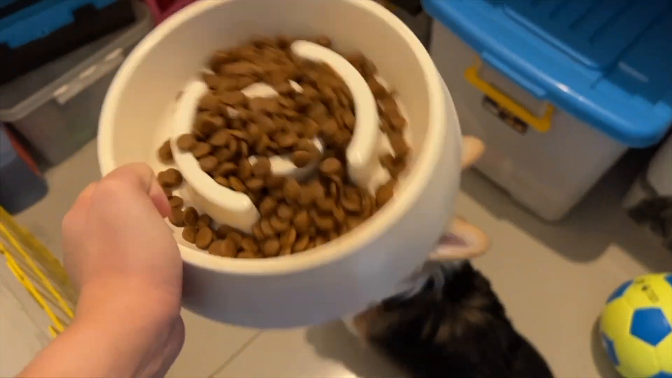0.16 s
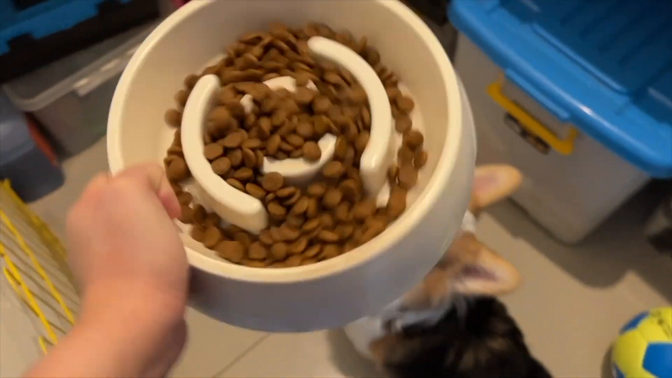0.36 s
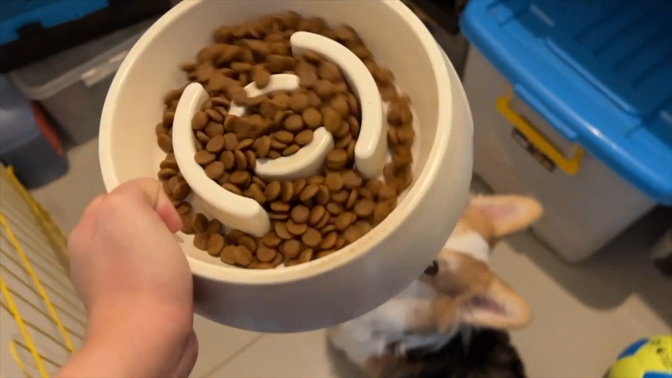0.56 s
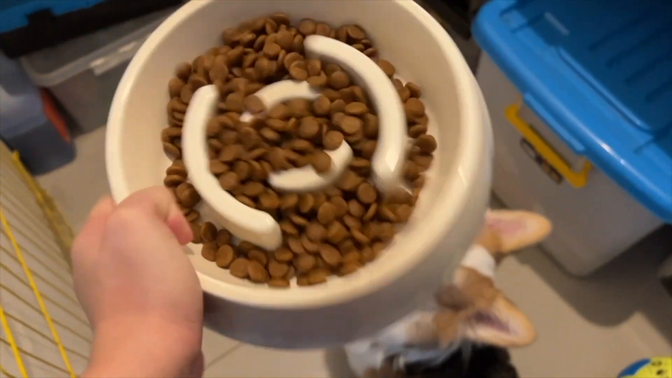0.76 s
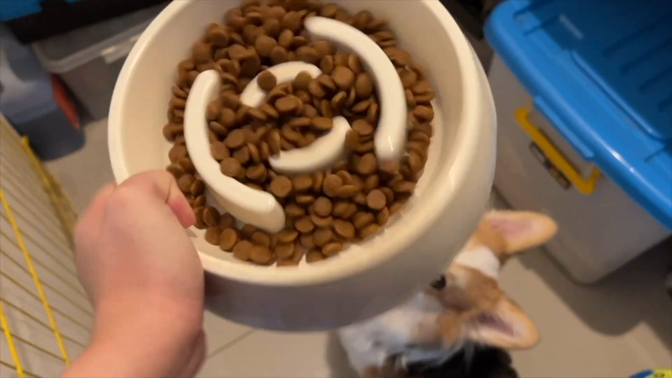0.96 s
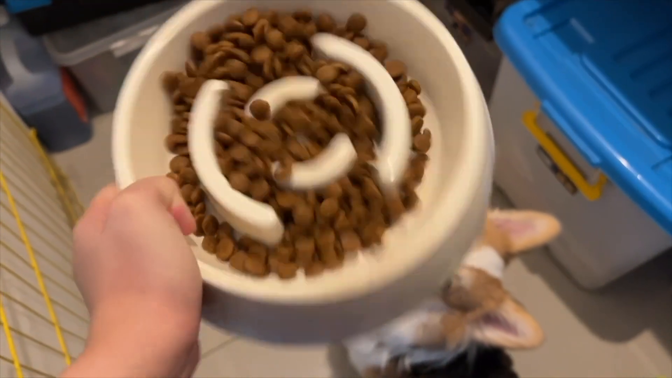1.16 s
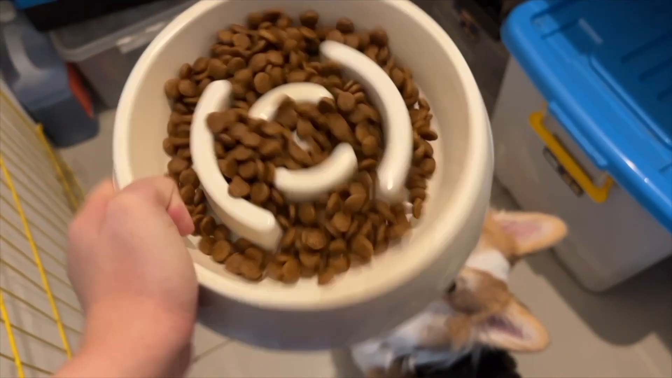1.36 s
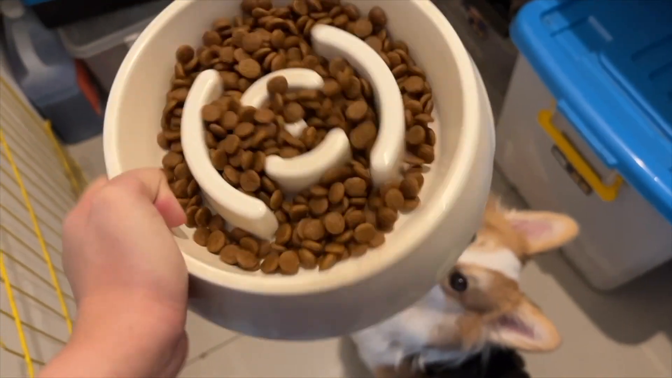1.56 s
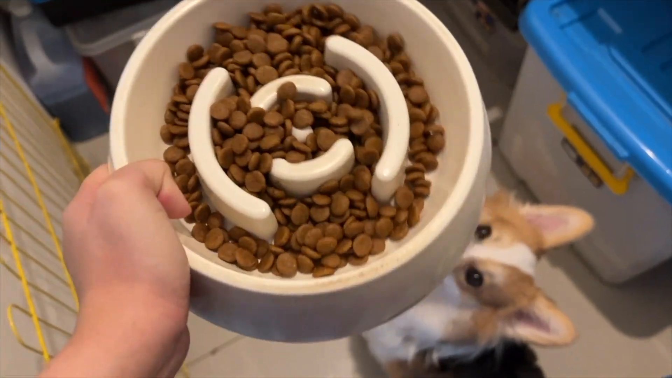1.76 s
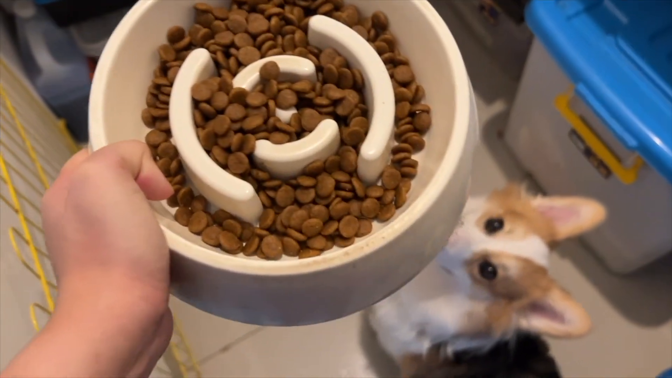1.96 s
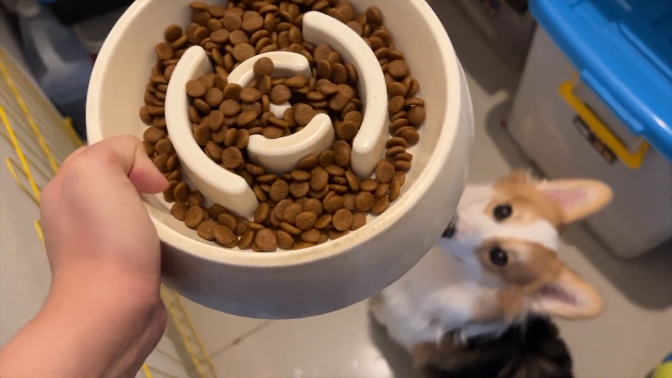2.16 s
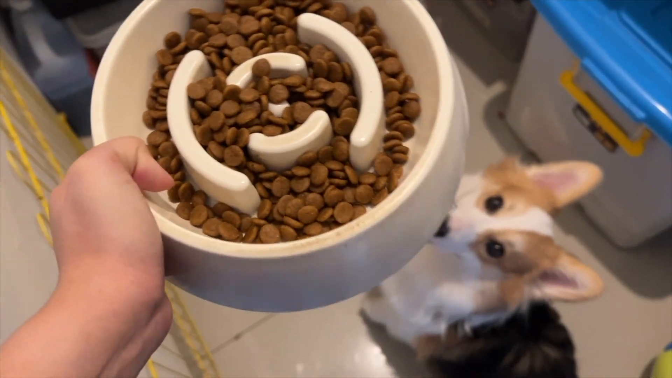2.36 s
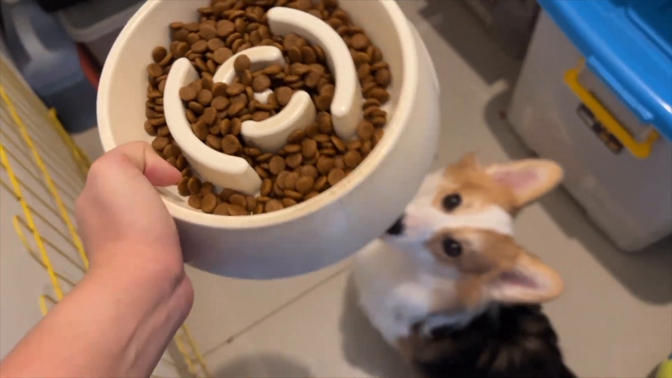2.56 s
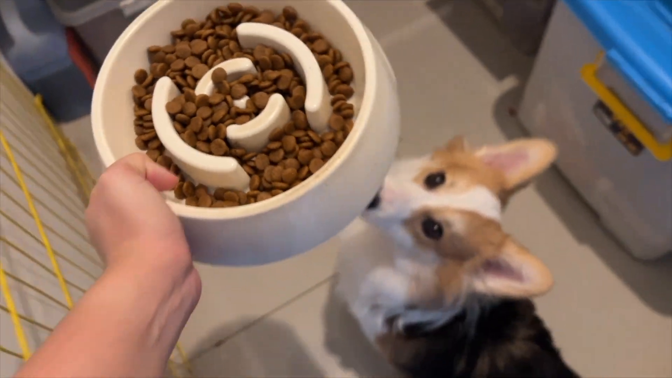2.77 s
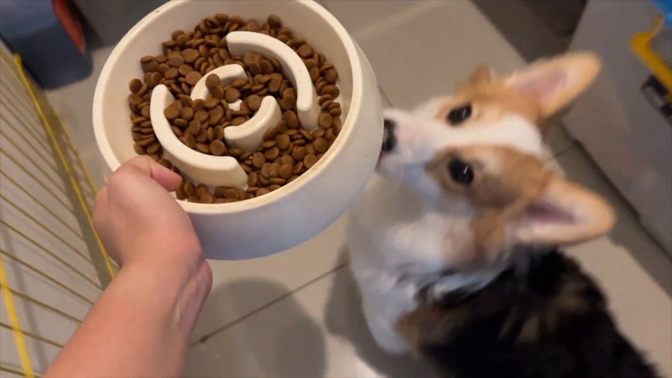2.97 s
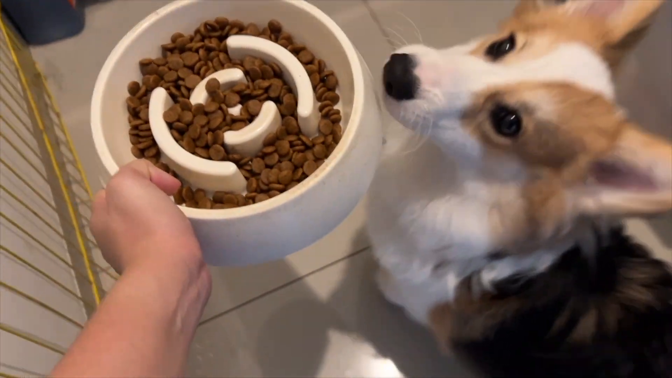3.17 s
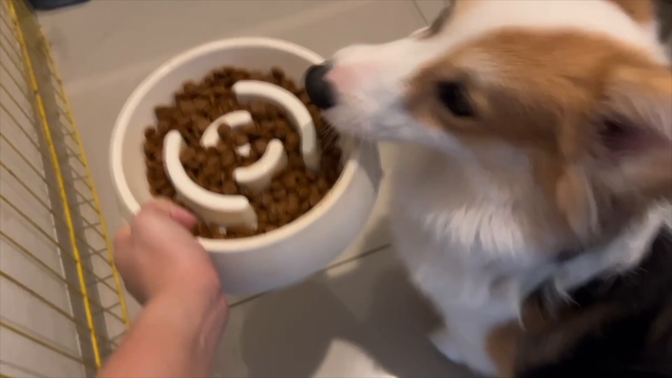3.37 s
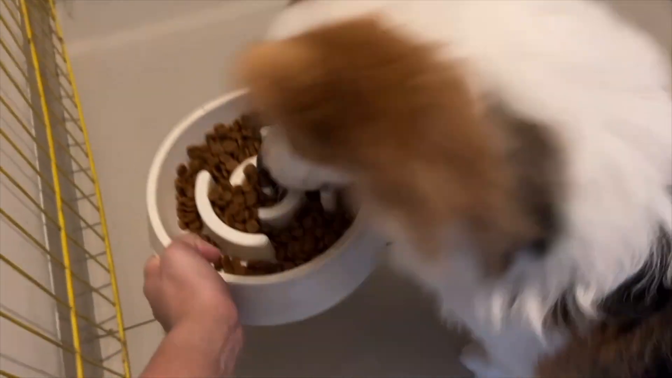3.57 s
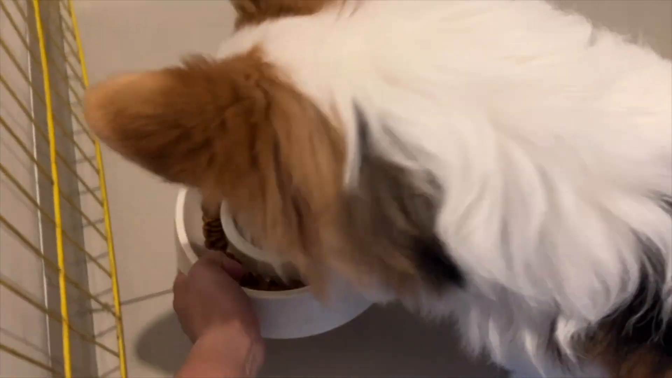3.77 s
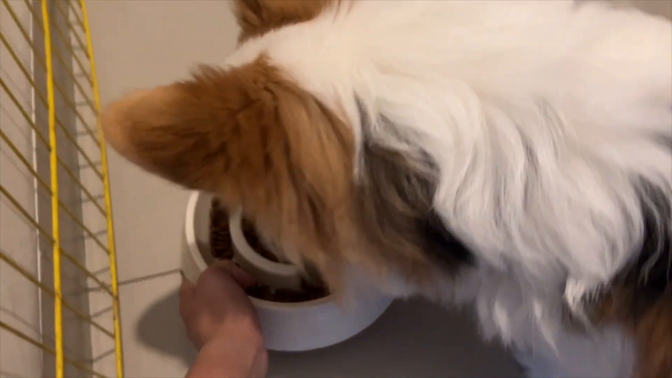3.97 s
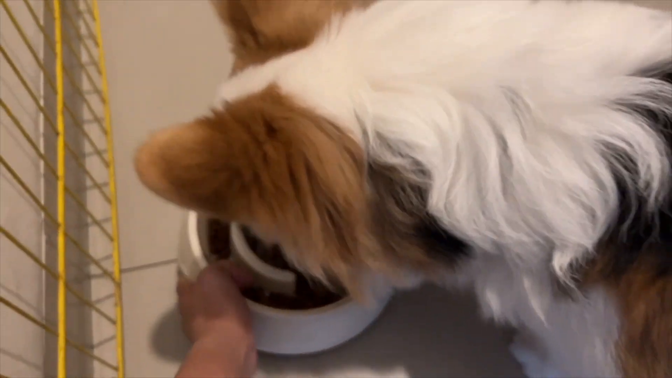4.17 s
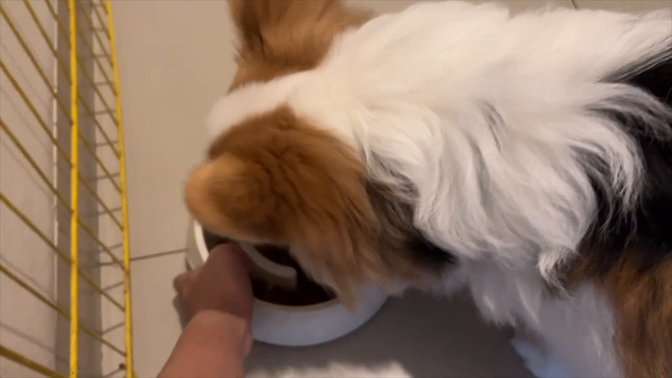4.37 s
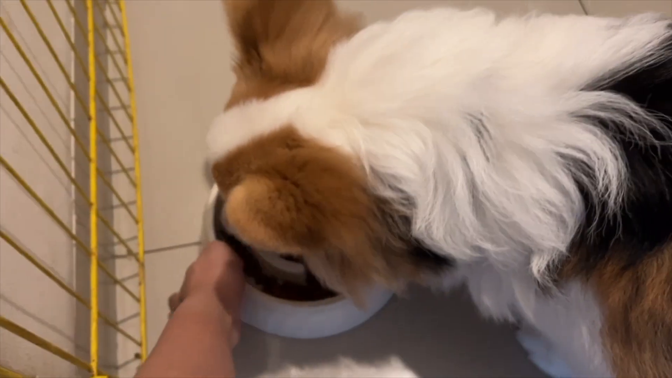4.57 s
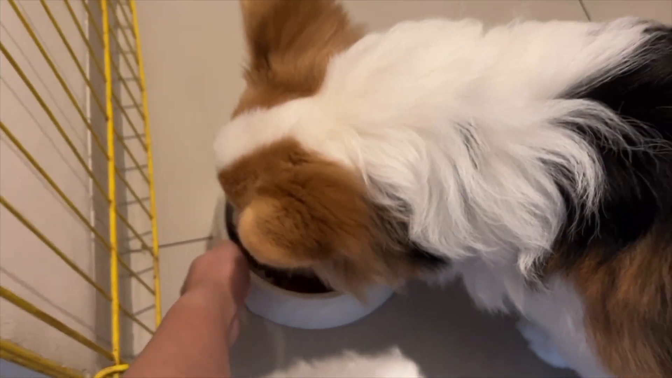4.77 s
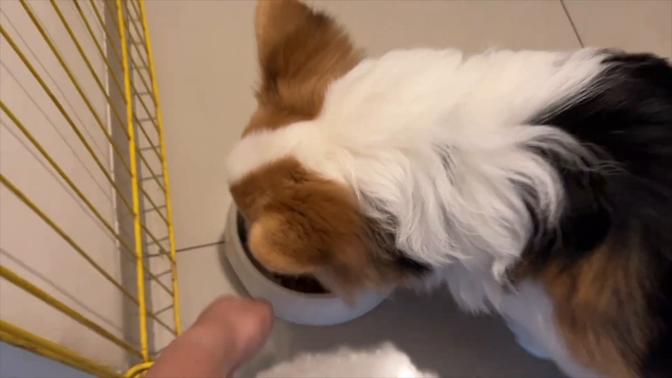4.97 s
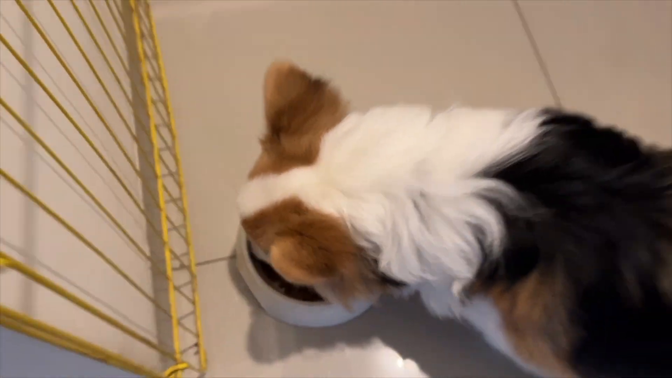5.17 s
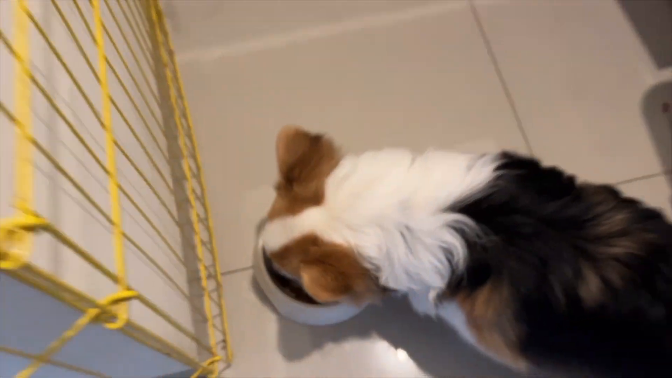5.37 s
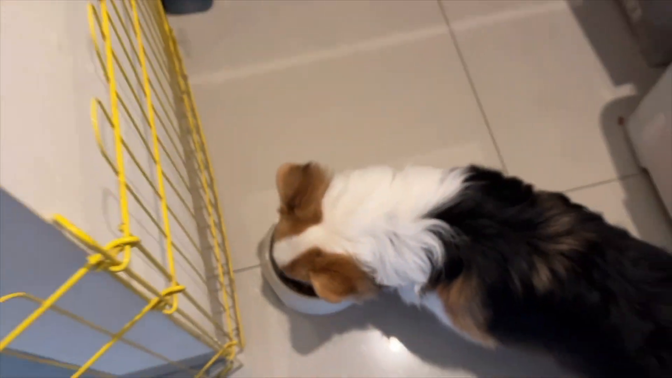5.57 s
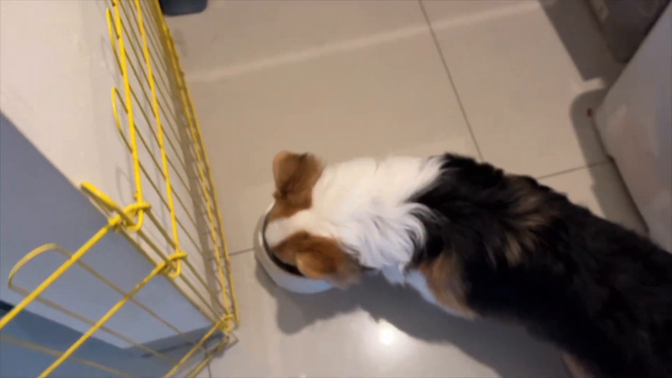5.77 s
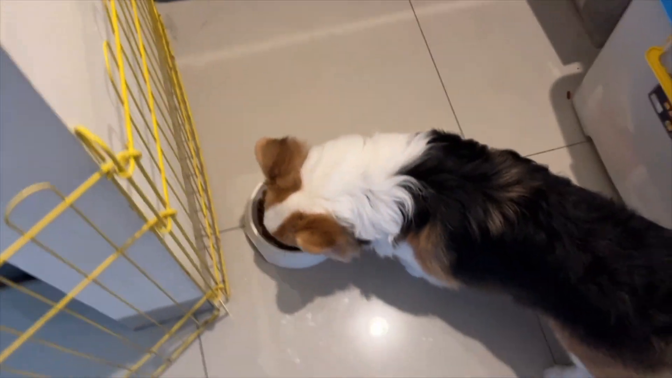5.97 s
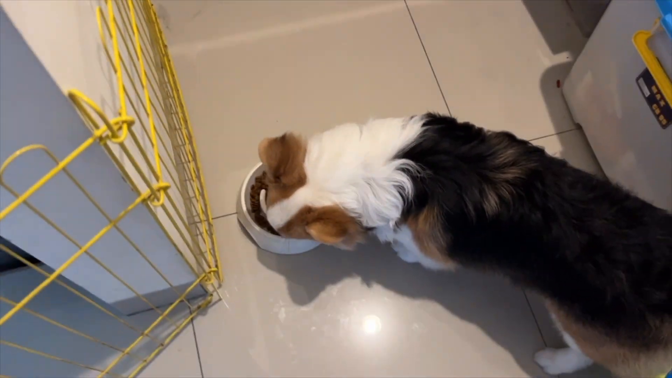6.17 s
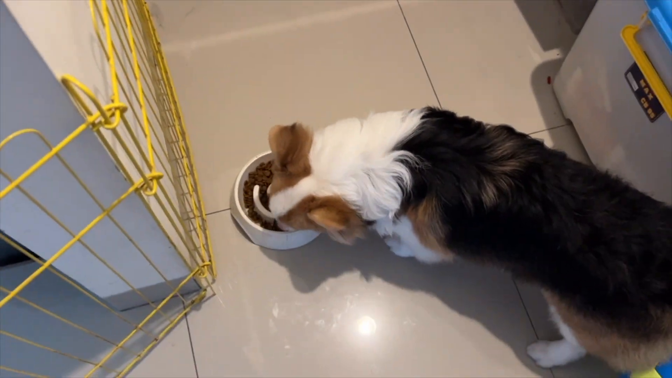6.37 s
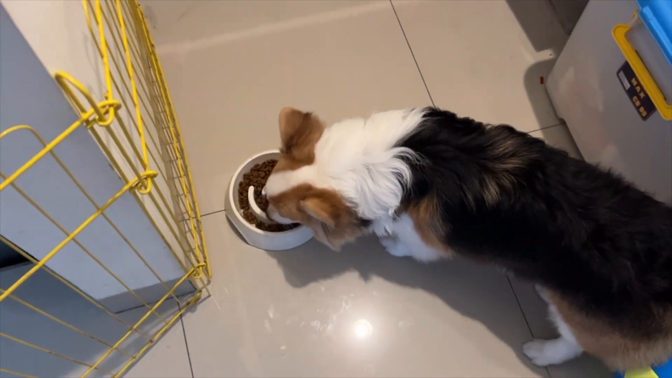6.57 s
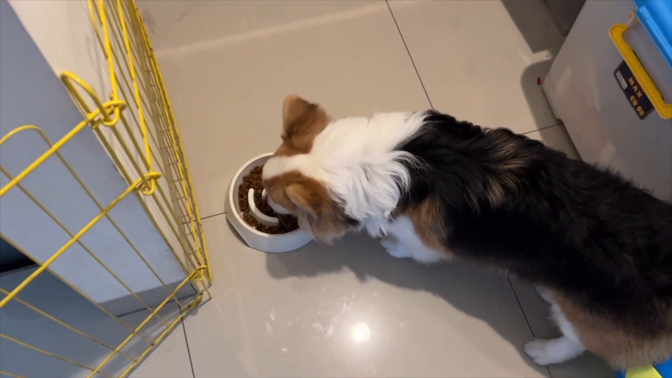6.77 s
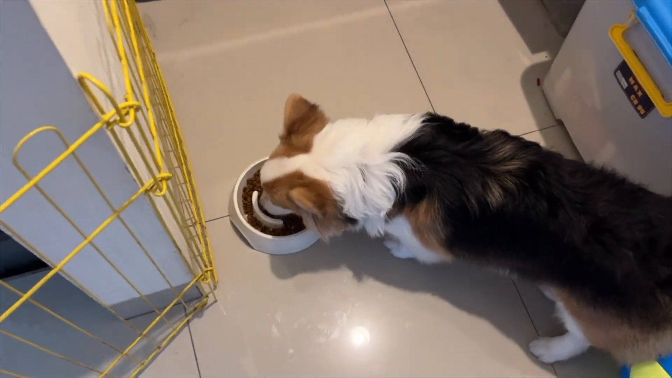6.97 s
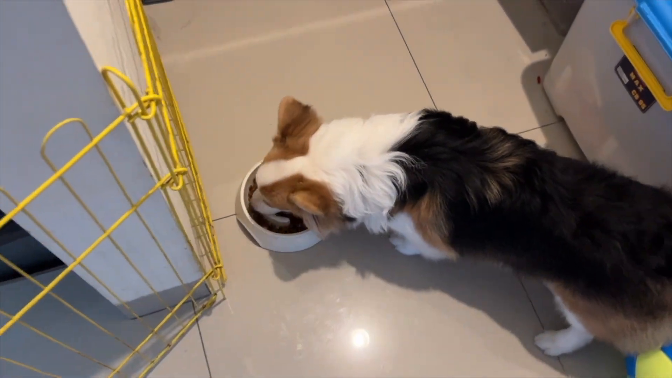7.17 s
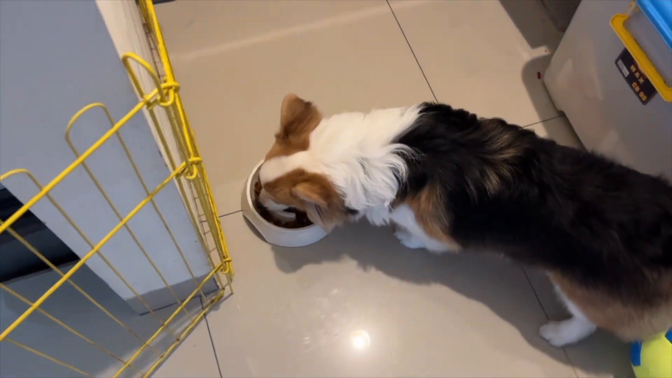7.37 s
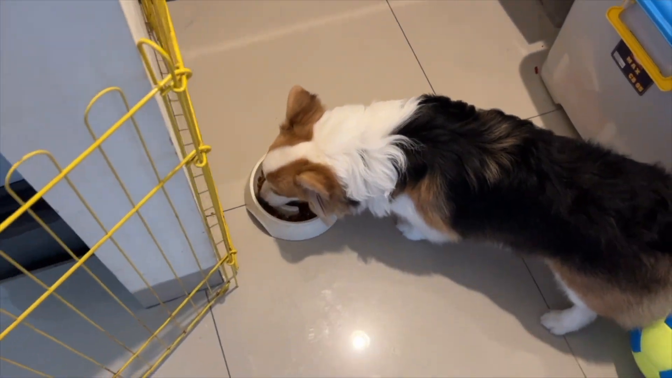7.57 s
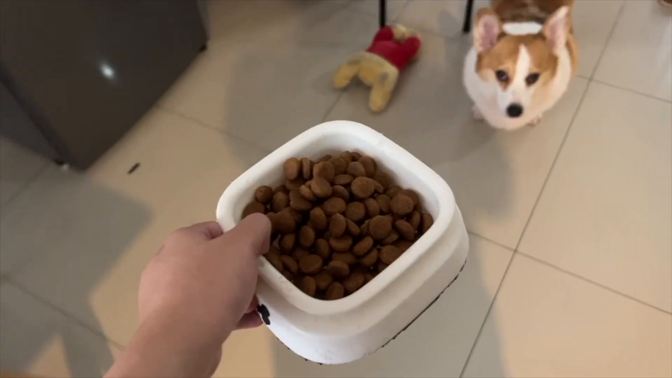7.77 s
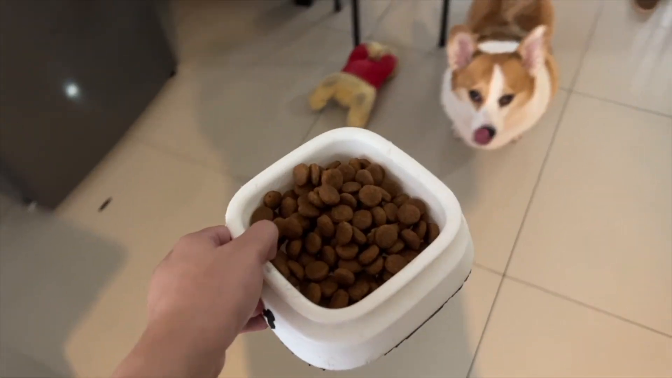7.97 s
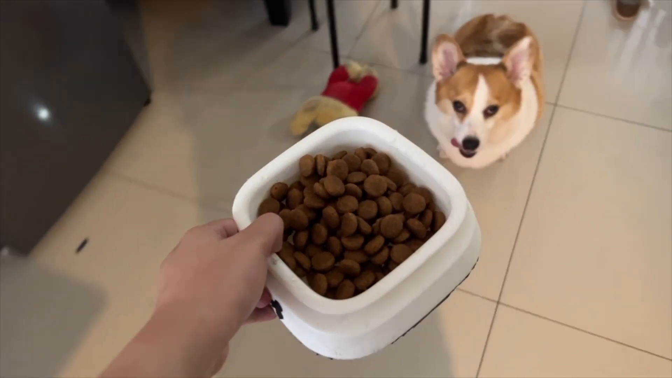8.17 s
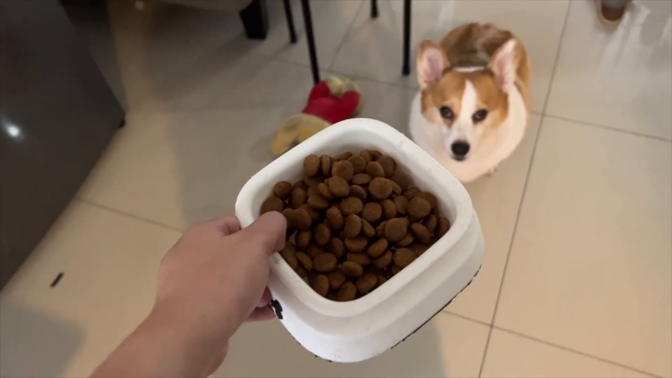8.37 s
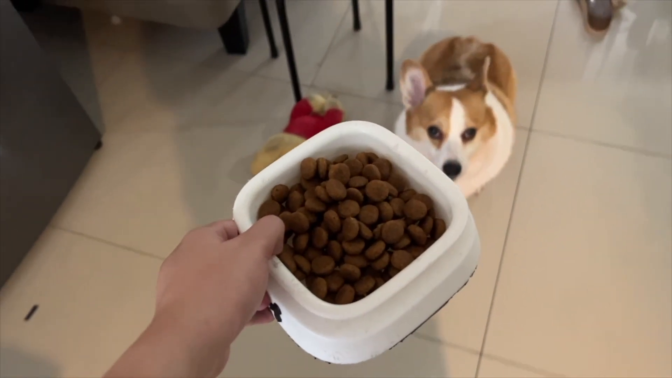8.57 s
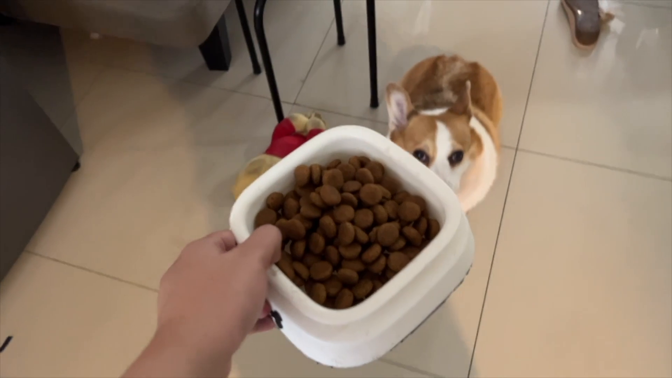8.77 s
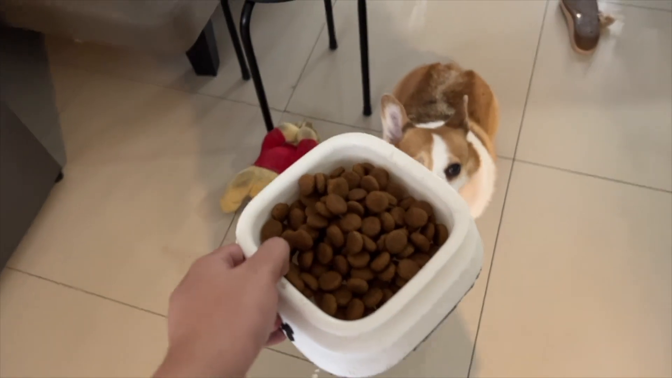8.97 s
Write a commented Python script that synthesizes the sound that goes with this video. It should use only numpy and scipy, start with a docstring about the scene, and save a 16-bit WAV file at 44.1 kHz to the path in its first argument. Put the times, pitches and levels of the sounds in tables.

```python
"""Dry kibble rattles in a shaken plastic slow-feeder bowl: streams of tiny collisions and single hard strikes.
The bowl goes down on a tile floor with low bumps, rubbing noise, ringing knocks and dull thuds in the room.
A dog noses through the pellets and crunches them: filtered ticking and runs of snaps, amid short squeaks,
scrapes and faint breath-like notes. After a short near-silent break, another bowl is held almost still in a
second quiet room. Low rumble and hum lie underneath; random echoes of a small, hard room surround the rest."""
import sys
import numpy as np
from scipy import signal
from scipy.fft import rfft, irfft
from scipy.io import wavfile
from scipy.ndimage import uniform_filter1d

SR = 44100
rng = np.random.default_rng(int(sys.argv[2]) if len(sys.argv) > 2 else 0)


def transcribe(u):
    """Save the signal u as a 16-bit wav file named by the first command-line argument.

    u: samples, shape (n,) or (channels, n), limited to [-1, 1]; the rate is SR.
    q: integer samples, one column per channel.
    """
    v = np.clip(np.atleast_2d(u).T, -1, 1)
    q = np.round(v * 32767).astype(np.int16)
    wavfile.write(sys.argv[1], SR, q)


N = 397341
TIME = np.arange(N) / SR
FREQS = np.fft.rfftfreq(4096, 1 / SR)
BREAK_START_S, BREAK_END_S = 7.662, 7.705  # near-silence between the two rooms


def amp(db):
    """Decibels to gain."""
    return 10 ** (np.asarray(db) / 20)


def unit(x):
    """Scales to an rms of one."""
    return x / np.sqrt(np.mean(x ** 2) + 1e-20)


def norm(x):
    """Scales to an energy of one."""
    return x / (np.linalg.norm(x) + 1e-12)


def add(mix, s, sound):
    """Mixes a sound in at a time in seconds."""
    part = mix[max(round(s * SR), 0):][:len(sound)]
    part += sound[:len(part)]


def read(points, hz=FREQS):
    """Joins (f/Hz, value) points on a log-frequency axis."""
    f, value = np.transpose(points)
    return np.interp(np.log(hz + 1), np.log(f + 1), value)


def curve(rows):
    """Joins (t/s, value) points at every sample."""
    return np.interp(TIME, *np.transpose(rows))


def wander(per_s):
    """A random course between -1 and 1, with per_s new targets each second."""
    return np.interp(TIME * per_s, np.arange(200), rng.uniform(-1, 1, size=200))


def swell(start, length, rise_s, fall_db_per_s, t=TIME):
    """Attack, hold and release of one movement, as a gain."""
    attack = np.clip((t - start) / rise_s, 0, 1)
    return attack * amp(-fall_db_per_s * np.maximum(t - start - length, 0))


def movements(rows, rise_s, fall_db_per_s):
    """Joint gain of overlapping movements (start t/s, length/s, level/dB), whose powers add."""
    t = TIME[::32]  # a coarse time grid is enough for a slow gain
    power = sum((amp(db) * swell(start, length, rise_s, fall_db_per_s, t)) ** 2
                for start, length, db in rows)
    return np.interp(TIME, t, np.sqrt(power))


def humps(peaks):
    """Bell-shaped resonances or dips (f/Hz, width/Hz, level/dB), as a dB curve."""
    return sum(db * np.exp(-2 * ((FREQS - hz) / width) ** 2) for hz, width, db in peaks)


def mirrored(db):
    """A gain curve over the full circle of frequencies."""
    return np.interp(abs(np.fft.fftfreq(4096, 1 / SR)), FREQS, db)


def colour(x, db):
    """Minimum-phase filter with the given gain, so that clicks keep their sharp start."""
    log_gain = np.log(amp(mirrored(db)))
    spectrum = np.exp(np.conj(signal.hilbert(log_gain)))
    taps = irfft(spectrum[:2049])
    taps = taps.reshape((1,) * (x.ndim - 1) + (-1,))
    return signal.oaconvolve(x, taps, axes=-1)[..., :N]


def butter(x, hz, kind, order=2):
    """Low-pass or high-pass."""
    sos = signal.butter(order, min(hz, SR / 2 - 1), kind, fs=SR, output="sos")
    return signal.sosfilt(sos, x)


# tones of a machine's hum: (start t/s, hold/s, f/Hz, level/dB before the waver)
HUM_TONES = [(0, 1.8, 128.6, -62), (2.5, 0.6, 128.6, -70), (2, 1.1, 128.6, -59.5), (0.9, 1.5, 43.1, -61),
             (3, 0.9, 43.1, -58.5), (0.4, 3.4, 86.1, -64), (0.2, 0.5, 149, -65), (6, 1.2, 129, -73),
             (5.5, 1.12, 129.2, -62), (6.5, 0.69, 150, -64), (7, 0.68, 161.2, -61), (8, 0.65, 140, -65.5),
             (7.7, 0.94, 226, -74.5)]
HUM_RISE_S, HUM_FALL_DB_PER_S = 0.13, 33  # the hum comes and goes slowly
HUM_WAVER_DB, RUMBLE_WAVER_DB, WAVER_PER_S = 0.5, 4, 5.0  # both rise and sink unevenly


def hum():
    """Low machine tones: sines that swell, waver and fade, with a slow drift of phase."""
    drift = unit(uniform_filter1d(uniform_filter1d(rng.standard_normal(N), size=16000), size=8000))
    out = np.zeros(N)
    for s, length, hz, db in HUM_TONES:
        level = amp(db + HUM_WAVER_DB * wander(WAVER_PER_S))
        envelope = swell(s, length, HUM_RISE_S, HUM_FALL_DB_PER_S)
        out += level * envelope * np.sin(2 * np.pi * hz * TIME + .5 * drift)
    return out


# relative colour of the rumble in each room: (f/Hz, level/dB)
FIRST_ROOM_COLOUR = [(20, -15.5), (42, -1.5), (62, -1.5), (90, -3), (108, 0), (130, 1), (165, -4),
                     (220, -8), (320, -12), (600, -27.5), (2000, -32), (5000, -43.5), (16000, -44)]
SECOND_ROOM_COLOUR = [(20, -17), (45, -1), (90, 2.5), (120, 1), (160, 4), (220, -7.5), (320, -8.5),
                      (600, -18), (2000, -23), (5000, -33), (16000, -44)]
# course of the rumble in each room: (t/s, level/dB before the waver)
FIRST_RUMBLE_LEVEL = [(0, -57), (0.6, -59.5), (0.8, -59), (1.1, -60), (2.0, -62.5), (3.1, -59.5),
                      (3.7, -61.5), (4.65, -66.5), (5.25, -65), (5.7, -60.5), (6.4, -63.5), (7.0, -63),
                      (7.6, -57.5)]
SECOND_RUMBLE_LEVEL = [(7.7, -57.5), (8.0, -59.5), (8.15, -65.5), (8.55, -64), (8.66, -59), (9, -60)]


def rumble(air, room_colour, level):
    """Noise shaped to the low end of one room, rising and sinking unevenly."""
    return unit(colour(air, read(room_colour))) * amp(curve(level) + RUMBLE_WAVER_DB * wander(WAVER_PER_S))


def background():
    """Low machine rumble of each room, nearly the same on both sides, plus the hum."""
    air = rng.standard_normal(N) + 0.44 * rng.standard_normal((2, N))
    first = rumble(air, FIRST_ROOM_COLOUR, FIRST_RUMBLE_LEVEL)
    second = rumble(air, SECOND_ROOM_COLOUR, SECOND_RUMBLE_LEVEL)
    return np.where(TIME < BREAK_END_S, first, second) + hum()


# heaviest handling bumps as the bowl goes down: (centre t/s, peak level/dB, f/Hz, half length/cycles)
HANDLING_BUMPS = [(3.800, -27.5, 115.5, 1), (3.8214, -14.5, 180, 0.67), (3.856, -29, 90, 0.65),
                  (3.872, -16.5, 240, 0.96), (3.889, -25, 110, 0.73), (3.912, -17, 138, 0.73),
                  (3.938, -21.5, 250, 0.55), (3.9515, -9, 125, 0.37), (3.980, -23, 124, 1.2),
                  (4.0173, -15.5, 142, .7), (4.060, -20.5, 150, 0.87), (4.074, -21, 150, 0.86),
                  (4.115, -20, 101.3, 0.41), (4.129, -26, 71.6, 1), (4.16, -31, 170, 0.85),
                  (4.205, -32, 150, 1.4), (4.237, -34, 131, 0.5), (4.26, -44, 200, 0.44),
                  (4.3, -38, 126, 0.41), (4.325, -44, 70.6, 0.67), (4.38, -38.5, 90, 0.89)]
# relative colour of the rubbing: (f/Hz, level/dB)
RUBBING_COLOUR = [(15, -54.5), (25, -17.5), (54, 2), (128, -3), (205, -4), (406, -16), (461, -23),
                  (700, -58.5), (910, -60), (1540, -120)]
# rubbing on the way down: it starts at once, holds, eases off and stops when the bowl stands
RUB_START_S, RUB_HOLD_S, RUB_STOP_S = 3.775, 0.18, 4.41
RUB_DB, RUB_RISE_S, RUB_EASE_DB_PER_S = -29, 0.04, 59.5
RUB_UNEVEN_DB = 3.5  # the rubbing catches and lets go


def handling():
    """Soft bumps of a cycle or two, out of step between the ports, over a low rubbing noise."""
    t = np.arange(-SR // 40, SR // 40) / SR
    bumps = np.zeros((2, N))
    for s, db, hz, cycles in HANDLING_BUMPS:
        bell = np.exp(-(t * hz / cycles) ** 2)
        for ear, phase in zip(bumps, (.45, -.45)):
            add(ear, s + t[0], amp(db) * np.sin(2 * np.pi * hz * t + phase) * bell)
    shared, own = rng.standard_normal(N), rng.standard_normal((2, N))
    rub = unit(colour(shared + 0.8 * own, read(RUBBING_COLOUR)))
    stop = np.clip((RUB_STOP_S - TIME) / RUB_RISE_S, 0, 1)
    pressure = swell(RUB_START_S, RUB_HOLD_S, RUB_RISE_S, RUB_EASE_DB_PER_S) * stop
    catching = unit(uniform_filter1d(rng.standard_normal(N), size=900))
    return bumps + amp(RUB_DB + RUB_UNEVEN_DB * catching) * pressure * rub


# modes of the first bowl, and of the square bowl in the second room:
# (f/Hz, level/dB before the scatter by place of contact, t60/s)
FIRST_BOWL_MODES = [(330, -9, .13), (375, -10, .1), (441, -14, .1), (540, -7, .08), (652, -1, .1),
                    (745, 0, .12), (815, 1, .11), (890, 0, .06), (975, 1, .07), (1050, 0, .08),
                    (1150, 2, .06), (1266, 5, .09), (1375, 2, .075), (1480, 1, .06), (1725, -1, .07),
                    (1772, 4, .135), (2208, -2.5, .16), (2345, -2, .06), (2885, -6, .11), (3230, -3, .05),
                    (3470, -3, .05)]
SQUARE_BOWL_MODES = [(374, -4, 0.2), (492, -3, 0.14), (660, 3, 0.07), (860, -6, 0.059), (1110, -3, 0.078),
                     (1300, -8, 0.078), (1860, -1, .12), (2150, 3.5, .14), (2630, -4, .04),
                     (2900, 1, 0.054), (3750, -2, .04)]


def bowl_ring(s, detune=0.):
    """Decaying modes of the bowl in use at s; contact place favours some, a leaning muzzle shifts them."""
    t = np.arange(SR // 4) / SR
    modes = FIRST_BOWL_MODES if s < BREAK_START_S else SQUARE_BOWL_MODES
    place = rng.uniform(-1.033, 1, (len(modes), 3))  # scatter of level, phase and pitch
    ring = np.zeros(len(t))
    for (hz, db, t60), (louder, phase, sharper) in zip(modes, place):
        decay = amp(db + 2 * louder - 60 * t / t60)
        ring += decay * np.sin(2 * np.pi * hz * (1 + detune * sharper) * t + np.pi * phase)
    return ring


# knocks on the bowl and dull thuds in the room:
# (t/s, level/dB, hardness of the contact as cut-off f/Hz, share of ring 0-1)
KNOCKS_AND_THUDS = [(2.602, -33.5, 703, .5), (2.719, -39, 1200, 0.5), (2.936, -28, 696, 0.7),
                    (2.950, -24.5, 468, 1), (2.971, -25.5, 587, 1), (3.059, -35, 1110, 0.4),
                    (3.168, -30.5, 960, 0.35), (3.358, -43, 1321, 0.1), (3.4705, -25, 1060, 0.3),
                    (3.561, -39, 907, 0.3), (3.595, -37, 1110, 0.5), (3.748, -24, 1793, 0.5),
                    (3.9872, 5, 870, 0.47), (4.110, -5, 1790, 1), (4.1265, -3.5, 3240, 1),
                    (4.136, 5, 2150, 0.8), (4.361, -15, 630, 0.4), (4.995, -26, 989, 0.9),
                    (6.305, -28, 860, 0.9), (7.469, -5, 613, 0.45), (7.488, -12, 690, 0.7),
                    (7.949, -29.5, 999, 0.9), (7.975, -35, 800, 0.8), (8.003, -41, 1390, 0.8),
                    (8.582, -33.5, 3200, 0.75), (8.642, -25.5, 3030, 0.8), (8.655, -31, 895, 0.9),
                    (8.735, -37, 560, 0.6)]
SOFT_CONTACT_TREBLE_DB = -24  # what even a soft contact leaves of the high modes


def knocking():
    """A short push and a share of decaying modes; a softer contact lasts longer and loses the treble."""
    t, out = np.arange(SR // 4) / SR, np.zeros(N)
    for s, db, hard_hz, ring in KNOCKS_AND_THUDS:
        u = 2 * np.pi * hard_hz * t
        push = butter((1 - u) * np.exp(-u), hard_hz, "low", order=4)
        push = norm(butter(push, max(280, 0.27 * hard_hz), "high"))
        modes = bowl_ring(s)
        body = norm(butter(modes, hard_hz, "low", order=7) + amp(SOFT_CONTACT_TREBLE_DB) * modes)
        add(out, s, amp(db) * norm(0.45 * push + ring * body))
    return out


# short squeaks, scrapes and faint breath-like notes:
# (t/s, level/dB, f/Hz, length/s, unsteadiness of pitch 0-1)
SHORT_NOTES = [(2.052, -75, 4840, 0.015, .05), (2.053, -67, 1930, 0.074, .13),
               (2.855, -59, 5880, 0.038, 0.24), (3.063, -70, 5500, .045, .11),
               (3.46, -56.5, 4220, 0.01, 0.07), (3.594, -63.5, 5350, 0.025, .08),
               (5.632, -48, 1590, 0.034, 0.1), (6.122, -59.5, 1196, 0.063, 0.12),
               (6.443, -50.5, 4380, .02, 0.05), (6.438, -57, 4750, .018, 0.02),
               (6.479, -48.5, 4400, 0.021, 0.02), (6.480, -48, 4810, .021, .05),
               (6.480, -51, 6000, 0.013, 0.04), (6.636, -65.5, 3880, 0.052, 0.02),
               (6.773, -74, 2200, 0.026, 0), (6.907, -66, 3530, 0.023, 0), (7.201, -53, 1747, 0.038, 0.13),
               (7.398, -52.5, 1457, 0.05, 0.11), (8.261, -69, 6410, 0.04, 0.16),
               (8.359, -63.5, 1688, .06, 0.18), (8.9, -69, 1136, 0.057, 0)]


def squeaks_and_breaths():
    """Short sine notes with a random waver; the more unsteady the pitch, the more like a scrape or breath."""
    out = np.zeros(N)
    for s, db, hz, length, unsteady in SHORT_NOTES:
        samples = max(round(length * SR), 100)
        waver = unit(uniform_filter1d(rng.standard_normal(SR // 4), size=30))[:samples]
        note = np.sin(2 * np.pi * np.cumsum(hz * (1 + unsteady * waver)) / SR)
        add(out, s, amp(db) * note * signal.windows.tukey(len(note), .2))
    return out


def snap(hz, ring_s, tone):
    """One hard pellet: a brief crack and a few cycles of its own ring."""
    t = np.arange(400) / SR
    crack = norm(rng.standard_normal(len(t)) * np.exp(-t / 0.00043))
    return norm(crack + tone * norm(np.sin(2 * np.pi * hz * t) * np.exp(-t / ring_s)))


def collisions(per_s, spread_db):
    """Random impacts at a mean rate, most small, a few large."""
    size = amp(spread_db * np.minimum(rng.exponential(1, N), 4))
    return size * (rng.random(N) < per_s / SR)


def grains(per_s, spread_db, count=24):
    """A steady stream of collisions shared out among pellets of different pitch."""
    size = collisions(per_s, spread_db)
    which, out = rng.integers(0, count, N), np.zeros(N)
    for k, hz in enumerate(np.linspace(1500, 14000, count)):
        out += signal.oaconvolve(size * (which == k), snap(hz, 0.0005, 0.59))[:N]
    return out


# resonances of the hollow under the muzzle: (f/Hz, width/Hz, level/dB), before shift and share
HOLLOW_PEAKS = [(760, 120, 8), (1560, 220, 4), (2330, 130, 3), (2900, 160, 3.5)]
EATING_START_S, EATING_END_S = 3.7, 7.68  # the muzzle is in the bowl
MUZZLE_SHIFT, MUZZLE_MOVES_PER_S = .13, 9  # largest shift as a share of the pitch; new positions a second


def hollow(x, db, share, count=5):
    """While the dog eats, the hollow under its muzzle resonates; its peaks shift as the head moves."""
    depth, places = wander(MUZZLE_MOVES_PER_S), np.linspace(-1, 1, count)
    covered = np.zeros(N)
    for p in places:
        peaks = [(hz * (1 + MUZZLE_SHIFT * p), width, share * top) for hz, width, top in HOLLOW_PEAKS]
        # crossfade between fixed head positions
        covered += colour(x, db + humps(peaks)) * np.interp(depth, places, places == p)
    return np.where((TIME > EATING_START_S) & (TIME < EATING_END_S), covered, colour(x, db))


# pellets pushed without a snap, by the hand or the muzzle:
# (start t/s, length/s, ticking against each other level/dB, scraping the wall level/dB)
PELLET_SHOVES = [(2.035, 0.083, -82.5, -74.5), (2.241, 0.029, -73.5, -72), (2.685, 0.095, -73, -68),
                 (2.927, 0.036, -71, -59.5), (3.124, 0.11, -77, -71), (3.536, 0.077, -86, -74.5),
                 (3.696, 0.06, -73, -62), (3.751, 0.12, -61.5, -57), (4.109, 0.0073, -45.5, -38),
                 (4.24, 0.033, -81, -56.5), (4.663, 0.029, -62, -56.5), (4.792, 0.14, -65, -60.5),
                 (5.593, 0.041, -62, -57.5), (5.778, 0.1, -65, -61.5), (5.956, 0.04, -59.5, -53),
                 (6.095, 0.051, -73, -66), (6.283, 0.025, -47.5, -59), (6.432, 0.03, -60, -57.5),
                 (6.458, 0.022, -53.5, -63), (6.627, 0.019, -92, -73), (6.752, 0.11, -92, -69),
                 (7.269, 0.038, -56.5, -56.5), (7.525, 0.097, -65, -63.5), (7.644, 0.13, -60, -70),
                 (7.924, 0.089, -67, -69), (8.067, 0.08, -61, -74), (8.344, 0.13, -86, -71.5),
                 (8.63, 0.029, -76, -61.5), (8.87, 0.033, -80, -69)]
# light stirring while the bowl is carried, eaten from and held: (start t/s, length/s, ticking level/dB,
# scraping level/dB)
LIGHT_STIRS = [(2.516, 1.2, -79, -76.5), (4.396, 3.2, -72.5, -68.5), (8.622, .4, -90.5, -82)]
# colour of pellets on the floor, before the split into ticks and wall: (f/Hz, level/dB)
FLOOR_PELLET_COLOUR = [(100, -34), (520, -3), (750, 1.5), (1700, 0.5), (2600, -1), (6000, 1), (9000, -1),
                       (12500, -9), (16000, -32)]
# every crunch stirs the pellets around it, from just before the snap
CRUNCH_LEAD_S, CRUNCH_STIR_S = 0.015, 0.023
STIR_UNDER_SNAP_DB, STIR_UNDER_WALL_DB = -44, -28.5
STIR_RISE_S, STIR_FALL_DB_PER_S = 0.023, 214.5  # all stirring swells and dies alike


def stirring():
    """Small collisions with every shove and crunch: bright between pellets, duller along the bowl's wall."""
    rustle = hollow(grains(1200, 2.2), read(FLOOR_PELLET_COLOUR), share=0.71)
    wall = unit(butter(rustle, 2800, "low", order=3))
    ticks = unit(butter(rustle, 4000, "high", order=3))
    around_crunches = [(s - CRUNCH_LEAD_S, CRUNCH_STIR_S, snap_db + STIR_UNDER_SNAP_DB,
                        wall_db + STIR_UNDER_WALL_DB)
                       for s, snap_db, _, wall_db, _ in PELLET_CRUNCHES]
    start, length, ticks_db, wall_db = np.transpose(PELLET_SHOVES + LIGHT_STIRS + around_crunches)
    ticks_gain = movements(zip(start, length, ticks_db), STIR_RISE_S, STIR_FALL_DB_PER_S)
    wall_gain = movements(zip(start, length, wall_db), STIR_RISE_S, STIR_FALL_DB_PER_S)
    return ticks * ticks_gain + wall * wall_gain


def rattle(ring, decay_s, first):
    """A first contact and a dying run of smaller ones, each sounding the given ring."""
    t = np.arange(SR // 12) / SR
    contacts = rng.standard_normal(len(t)) * (rng.random(len(t)) < 2200 / SR)
    run = contacts * np.exp(-t / max(decay_s, .001))
    run[0] = first
    return norm(signal.fftconvolve(run, ring))


# pellets shifting or cracking in a cluster, levels before colouring:
# (t/s, snap level/dB, snap f/Hz, blow to the bowl's wall level/dB, decay/s)
PELLET_CRUNCHES = [(2.2767, -32, 2700, -51, 0.0098), (2.3, -33.5, 8050, -53, 0.0041),
                   (2.6274, -14, 2900, -36, 0.0035), (2.749, -29.5, 2430, -49, 0.016),
                   (2.9307, -25, 4200, -35, 0.034), (3.229, -26.5, 2360, -41.5, 0.0022),
                   (3.2398, -23, 12000, -48, 0.0015), (3.26, -36, 11600, -55, 0.0024),
                   (3.388, -39.5, 6500, -72, .002), (3.4633, -36.5, 3940, -36.5, 0.0032),
                   (3.7882, -9, 7600, -23, 0.0027), (3.928, -20, 6640, -51, 0.0041),
                   (4.0793, -22, 3940, -30, 0.0096), (4.1969, -15, 6500, -44, 0.0068),
                   (4.264, -29.5, 2900, -31, .008), (4.3844, -8, 4700, -16.5, 0.0049),
                   (4.5052, -18.5, 6300, -24.5, 0.0076), (4.5998, -26.5, 2590, -31, 0.0074),
                   (4.6538, -22.5, 6560, -29.5, 0.02), (4.6994, -30, 2530, -24, .008),
                   (4.8793, -23.5, 12000, -44, 0.0014), (4.9765, -15, 2550, -19.5, 0.024),
                   (4.9882, -13, 9000, -21.5, 0.0046), (5.1351, -17.5, 6700, -33, 0.015),
                   (5.3032, -6, 9860, -38, 0.0077), (5.499, -26, 6130, -34.5, 0.014),
                   (5.6325, -15.5, 11300, -44, 0.0026), (5.636, -20.5, 6470, -48, 0.028),
                   (5.7912, -28.5, 3680, -32.5, 0.015), (5.818, -34, 7530, -33, .005),
                   (5.945, -39, 6100, -39, .004), (5.9913, -20, 6300, -33, 0.035),
                   (6.3036, -20, 4800, -27, 0.01), (6.4802, -22, 4500, -49, .0062),
                   (6.652, -41, 6130, -39, 0.0055), (6.829, -39, 6160, -39, .004),
                   (6.8732, -28.5, 6300, -43, 0.0071), (6.9112, -20.5, 6160, -54, 0.0097),
                   (6.989, -19.5, 8500, -28, 0.019), (7.075, -44, 6236, -43, 0.0053),
                   (7.1038, -19, 6240, -25.5, 0.054), (7.1877, -23, 3700, -34, 0.014),
                   (7.2679, -23, 5100, -29.5, 0.0043), (7.292, -43, 3910, -24, 0.013),
                   (7.334, -36, 6200, -39, .006), (7.4074, -21, 6240, -27, 0.02),
                   (7.4498, -5, 9100, -22, 0.0058), (7.4629, -7.5, 6710, -30, 0.017),
                   (7.504, -11, 10630, -25, 0.015), (7.947, -32, 3760, -41, 0.0059),
                   (8.642, -38, 2300, -45, 0.0083), (8.7722, -32.5, 2980, -42, 0.011)]
# colour of a breaking pellet: (f/Hz, level/dB)
CRACK_COLOUR = [(500, -8.5), (1500, -4.5), (4500, -0.5), (9000, -1.5), (12500, 3), (16000, 5.5)]
# colour of the bowl's wall under a crunch: (f/Hz, level/dB)
COVERED_WALL_COLOUR = [(300, -20.5), (560, -17), (720, -3.5), (1000, -2), (1500, -6), (2000, -6.5),
                       (3500, -4)]


def crunching():
    """Each crunch is a run of snaps, which also shake the bowl."""
    snaps, wall = np.zeros(N), np.zeros(N)
    for s, db, hz, wall_db, decay in PELLET_CRUNCHES:
        add(snaps, s, amp(db) * rattle(snap(hz, 0.0003, 1.0), decay_s=decay, first=0.87))
        add(wall, s, amp(wall_db) * rattle(bowl_ring(s, detune=0.068), decay_s=decay, first=4.8))
    return colour(snaps, read(CRACK_COLOUR)) + hollow(wall, read(COVERED_WALL_COLOUR), share=1.1)


def pings(hz, width, per_s, spread_db, count=5):
    """Sparse collisions that ring near one pitch, each a little higher or lower."""
    size = collisions(per_s, spread_db)
    which, t = rng.integers(0, count, N), np.arange(SR // 50) / SR
    out = np.zeros(N)
    for k, f in enumerate(hz + width * np.linspace(-.5, .5, count)):
        ring = np.sin(2 * np.pi * f * t) * np.exp(-np.pi * width * t)
        out += signal.oaconvolve(size * (which == k), ring)[:N]
    return out


STRIKE_RISE_S, STRIKE_CHATTER_S = 0.00013, .0018  # a strike chatters briefly
STRIKE_RING_S, STRIKE_TONE = 0.0014, 0.33  # and rings a little


def strike(hz):
    """A pellet hits a ridge: a few milliseconds of chatter and its own ring."""
    t = np.arange(SR // 50) / SR
    attack = 1 - np.exp(-t / STRIKE_RISE_S)
    chatter = norm(rng.standard_normal(len(t)) * attack * np.exp(-t / STRIKE_CHATTER_S))
    ring = norm(np.sin(2 * np.pi * hz * t) * attack * np.exp(-t / STRIKE_RING_S))
    return norm(chatter + STRIKE_TONE * ring)


# each tilt of the bowl sends the heap sliding: (start t/s, length/s, level/dB)
HEAP_SLIDES = [(-0.03, 0.1, -43.5), (.075, 0.094, -42), (.165, 0.27, -36.5), (.55, 0.14, -40.5),
               (.71, 0.15, -37.5), (.885, 0.11, -33.5), (1.1, 0.3, -35), (1.51, 0.06, -41.5)]
# resonances rung by the sliding heap: (f/Hz, width/Hz, level/dB against its ticking)
HEAP_RINGS = [(835, 200, -22), (1690, 180, -16.5), (2400, 200, -20.5), (2830, 420, -20), (3930, 520, -14.5),
              (4500, 300, -17.5), (6180, 300, -14), (7400, 300, -18)]
# hardest single strikes on the bowl's ridges, levels before colouring:
# (t/s, click level/dB, ring f/Hz, blow to the bowl's wall level/dB)
RIDGE_STRIKES = [(0.059, -21, 3900, -16.5), (0.066, -20.5, 6050, -21.5), (0.129, -21.5, 6070, -18),
                 (0.141, -14, 5460, -24.5), (0.18, -8.5, 3900, -10.5), (0.184, -4.5, 3750, -11.5),
                 (0.193, -8.5, 5640, -18), (0.244, -11.5, 6050, -22), (0.254, -2.5, 9350, -11),
                 (0.291, -12.5, 6050, -19.5), (0.303, -8.5, 11900, -14.5), (0.3177, -12.5, 4020, -10),
                 (0.3425, -2, 6200, -11), (0.3727, -2, 6000, -8.5), (0.38, -5.5, 6050, -20.5),
                 (0.411, -15.5, 4500, -15), (0.441, -13, 3930, -12.5), (0.473, -11, 3600, -13),
                 (0.495, -13, 8050, -27), (0.5287, -11, 6000, -16), (0.5513, -5.5, 6050, -10),
                 (0.6188, -9.5, 3830, -15.5), (0.63, -6.5, 4030, -9), (0.660, -12, 4000, -18.5),
                 (0.667, -11.5, 6050, -15.5), (0.6888, -6, 9100, -20), (0.7217, -11.5, 3750, -10),
                 (0.735, -11, 6050, -16.5), (0.7436, -7, 7500, -5), (0.7744, -11.5, 6050, -18.5),
                 (0.784, -6.5, 12100, -19.5), (0.8073, -7.5, 3900, -27), (0.844, -6, 4150, -10.5),
                 (0.884, -5, 6050, -14), (0.8996, -2, 4500, -13.5), (0.911, -5.5, 6300, -9.5),
                 (0.921, 0.5, 3900, -8), (0.932, -4, 6050, -6.5), (0.974, -1, 8500, -11.5),
                 (1.003, -2.5, 3800, -11.5), (1.057, -7, 8850, -18), (1.068, -6, 7450, -18.5),
                 (1.085, -9.5, 11900, -18.5), (1.095, 0.5, 5900, -9), (1.115, 0, 6200, -5.5),
                 (1.1464, -4.5, 5940, -11.5), (1.163, -7.5, 3970, -3.5), (1.181, -5, 3940, -6.5),
                 (1.198, -1, 4050, -6.5), (1.209, -2, 3870, -4), (1.2532, -3, 7200, -10),
                 (1.256, -11, 7450, -14.5), (1.287, -7.5, 8500, -21), (1.291, -0.5, 7600, -11.5),
                 (1.307, -3.5, 11400, -18.5), (1.323, -1, 6000, -14), (1.36, -4, 5630, -19),
                 (1.3761, -1, 11970, -19), (1.446, -14, 5900, -21), (1.4697, -8.5, 7550, -21),
                 (1.494, -6.5, 8060, -24), (1.516, -2, 6140, -8.5), (1.5249, 1, 6050, -10),
                 (1.631, -21.5, 6050, -20)]
# colour of the near pellets: (f/Hz, level/dB)
NEAR_PELLET_COLOUR = [(100, -25.5), (400, -18.5), (800, -5.5), (1700, -6.5), (2400, -1), (3300, -1.5),
                      (4200, 0.5), (9000, -1.5), (12500, -2.5), (16000, 1.5)]
# resonances added to the hard strikes: (f/Hz, width/Hz, level/dB)
STRIKE_PEAKS = [(1680, 300, 8), (3940, 500, 4.5), (6050, 240, 3.5)]
SLIDE_RISE_S, SETTLE_DB_PER_S = 0.019, 95.5  # the heap gets going, then comes to rest
SHAKE_END_S, LAST_PELLETS_DB_PER_S = 1.664, 246  # once the bowl is level the last pellets stop quickly


def shaking():
    """The heap slides, each collision ringing one resonance or none; single pellets strike the ridges."""
    tone_db = read(NEAR_PELLET_COLOUR) + humps(STRIKE_PEAKS)
    stop = amp(-LAST_PELLETS_DB_PER_S * np.maximum(TIME - SHAKE_END_S, 0))
    sliding = movements(HEAP_SLIDES, SLIDE_RISE_S, SETTLE_DB_PER_S) * stop
    ticking = unit(colour(grains(1900, 2.8, count=40), read(NEAR_PELLET_COLOUR)))
    ringing = sum(amp(db) * unit(pings(hz, width, per_s=85, spread_db=1.5))
                  for hz, width, db in HEAP_RINGS)
    strikes, wall = np.zeros(N), np.zeros(N)
    for s, db, hz, wall_db in RIDGE_STRIKES:
        add(strikes, s, amp(db) * strike(hz))
        add(wall, s, amp(wall_db) * strike(rng.uniform(843, 3000)))
    # the hard single strikes are brighter than the sliding heap
    brighter_db = read([(1500, -13), (5000, -3.5), (9000, 4.0), (13000, 6.0)])
    strikes = colour(strikes, tone_db + brighter_db)
    return (ticking + ringing) * sliding + strikes + colour(butter(wall, 5600, "low"), tone_db)


# decay time of the echo tail: (f/Hz, t60/s)
TAIL_T60 = [(100, 0.96), (500, .55), (1300, 0.5), (3500, 0.5), (7000, 0.55), (10000, 0.14), (15000, 0.47)]


def echoes(wet_db, early_db):
    """Early echoes from floor and walls and a noise tail with its own decay per band, for each ear."""
    hz, t, z = signal.stft(rng.standard_normal((2, SR // 2)), SR, nperseg=256)
    decay = amp(-60 * t / read(TAIL_T60, hz)[:, None])
    tail = signal.istft(z * decay, SR, nperseg=256)[1]
    lag = np.arange(tail.shape[1]) / SR
    tail *= np.clip(lag / 0.002, 0, 1)
    early = rng.standard_normal(tail.shape) * (rng.random(tail.shape) < 1800 / SR)
    early = early * (lag > .001) * np.exp(-lag / 0.011)
    return np.array([amp(wet_db) * norm(a) + amp(early_db) * norm(b) for a, b in zip(tail, early)])


# phase between the two microphone ports: (f/Hz, lead of the left/rad)
PORT_LEAD = [(100, 0.34), (1000, -0.41), (1550, 1.23), (4800, 1.59), (7200, -1.9), (8350, 0.5),
             (11000, 1.5), (16000, 0.47)]
# balance of the ports: (f/Hz, left minus right level/dB)
PORT_LEVELS = [(100, 2.5), (350, 3), (700, -3), (1300, -1.5), (2400, 1.5), (4400, -2), (8000, -2),
               (15000, 1)]


def room(x, wet_db, early_db, count=4):
    """Direct sound at two ports, plus several sets of random echoes, crossfaded in turn; none cross the break."""
    side = np.array([[.5], [-.5]])
    turn = np.exp(1j * side * read(PORT_LEAD, np.fft.rfftfreq(2 * N, 1 / SR)))
    heard = irfft(rfft(x, 2 * N) * turn)[:, :N]
    for k in range(count):
        # the sets take turns every 0.07 s, which avoids a fixed colouring
        away = abs((TIME / .07 + k) % count - count / 2)
        taps = echoes(wet_db, early_db)
        feed = x * np.cos(np.pi / 2 * np.minimum(away, 1))
        parts = np.split(feed, [round(BREAK_START_S * SR)])
        heard += np.hstack([signal.oaconvolve(part[None], taps, axes=1)[:, :len(part)] for part in parts])
    return np.array([colour(ear, share * read(PORT_LEVELS)) for ear, share in zip(heard, side)])


def scene():
    """The shaken bowl is close; on the floor it is farther off and the room is stronger."""
    near = room(shaking(), wet_db=-9.0, early_db=-3.0)
    far = room(stirring() + crunching() + squeaks_and_breaths(), wet_db=-4.0, early_db=-0.5)
    knocks = room(knocking(), wet_db=-11.5, early_db=-3.0)
    return near + far + knocks + handling() + background()


# treble dips of the microphone: (f/Hz, width/Hz, level/dB)
TREBLE_DIPS = [(10496, 770, -20), (14000, 1840, -17.5), (16260, 1400, -17.5)]
LOW_CUT_HZ, EDGE_HZ = 23, 16000  # lower and upper band limits


def record(dry):
    """The microphone's treble dips and low cut, the 37 dB drop between the rooms, and the band limit."""
    heard = butter(colour(dry, humps(TREBLE_DIPS)), LOW_CUT_HZ, "high", order=4)
    running = uniform_filter1d(1. * ((TIME < BREAK_START_S) | (TIME > BREAK_END_S)), size=100)
    heard = heard * np.maximum(running, amp(-37))
    band_limit = signal.firwin(255, EDGE_HZ, window=("kaiser", 9), fs=SR)
    return signal.oaconvolve(heard, band_limit[None], "same")


dry = scene()
out = record(dry)
transcribe(out)
```